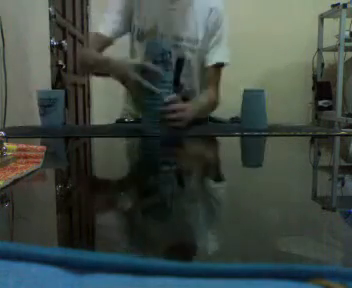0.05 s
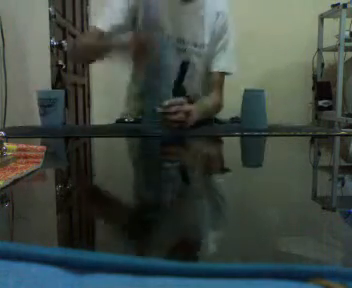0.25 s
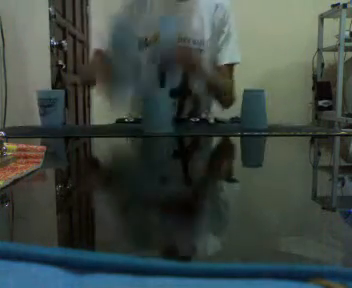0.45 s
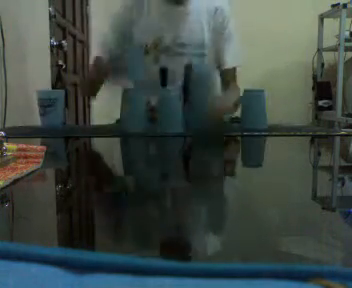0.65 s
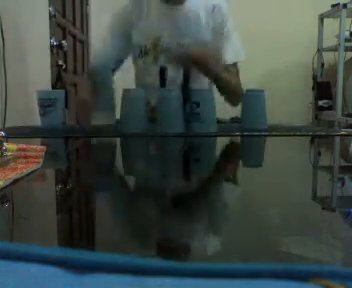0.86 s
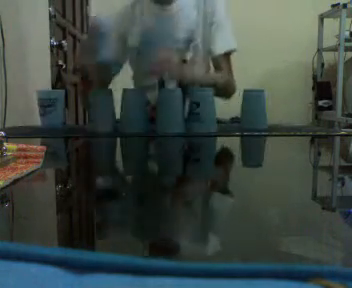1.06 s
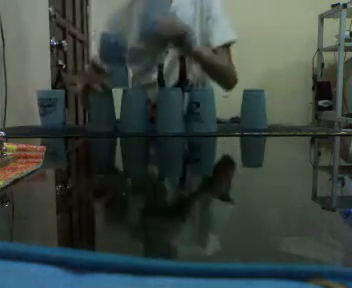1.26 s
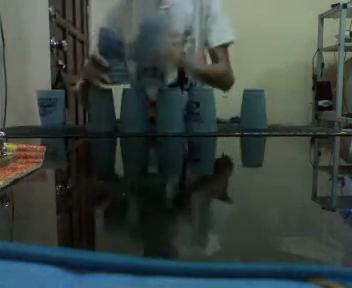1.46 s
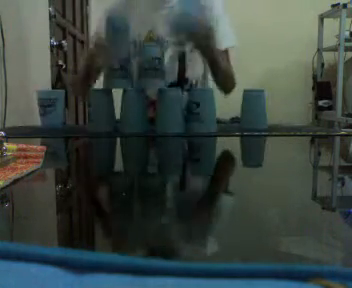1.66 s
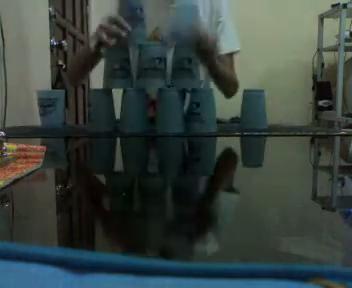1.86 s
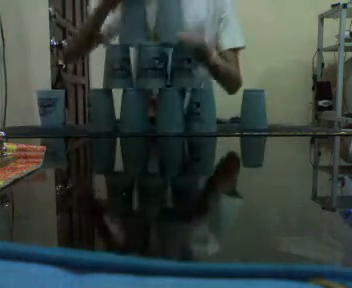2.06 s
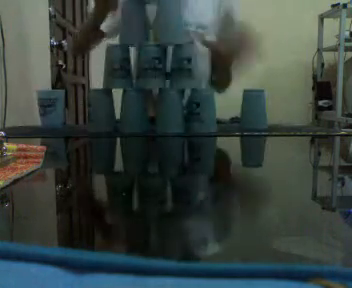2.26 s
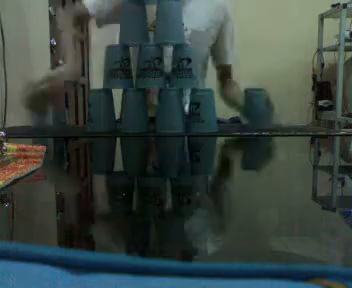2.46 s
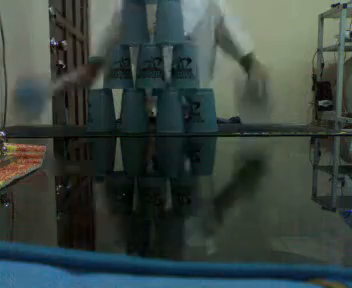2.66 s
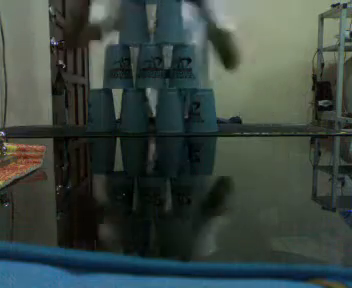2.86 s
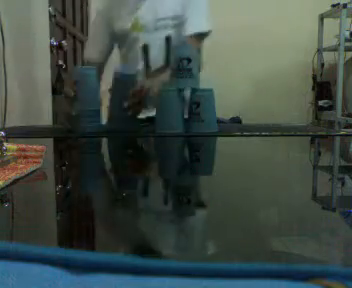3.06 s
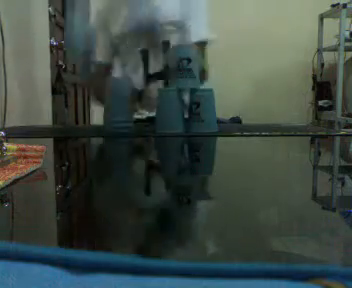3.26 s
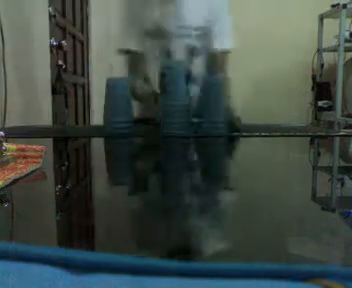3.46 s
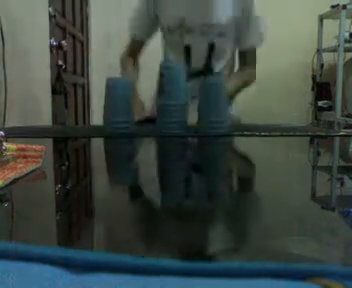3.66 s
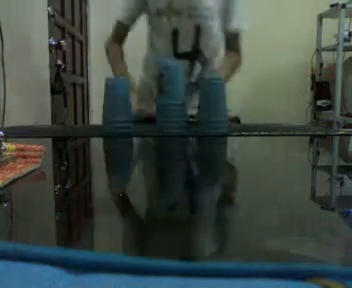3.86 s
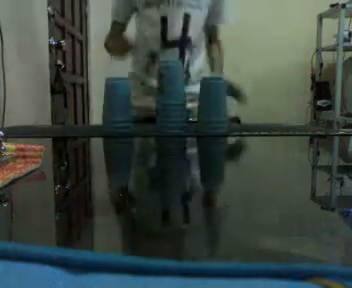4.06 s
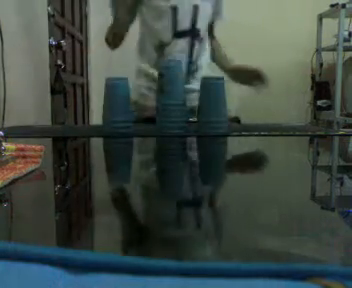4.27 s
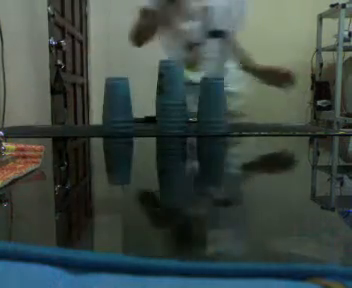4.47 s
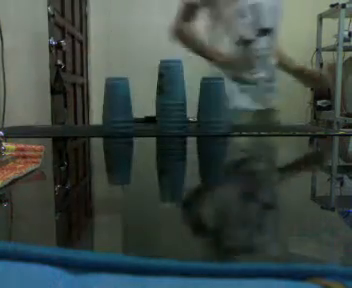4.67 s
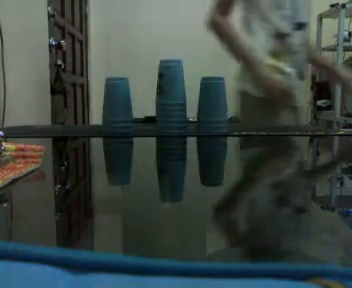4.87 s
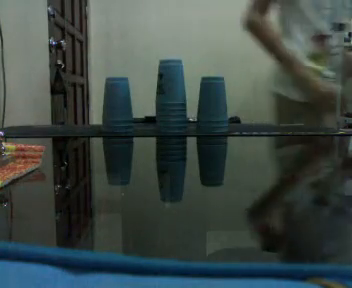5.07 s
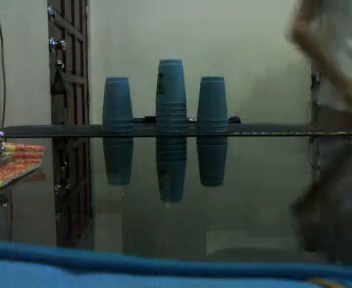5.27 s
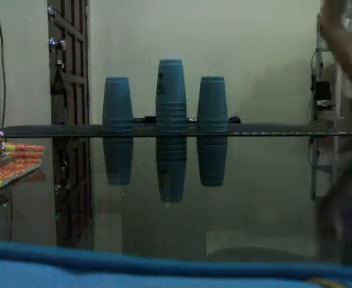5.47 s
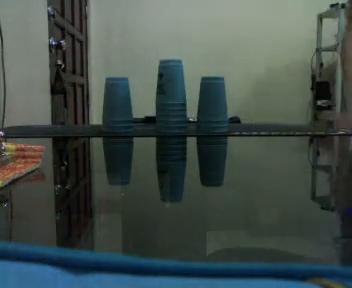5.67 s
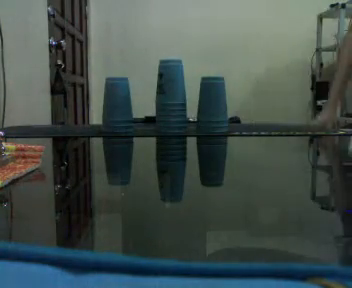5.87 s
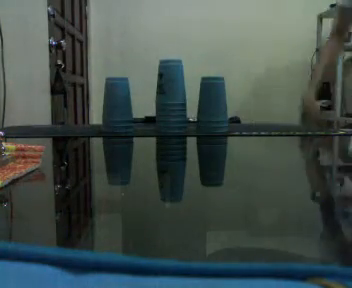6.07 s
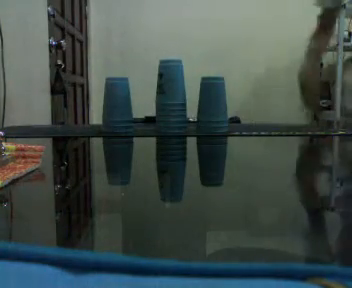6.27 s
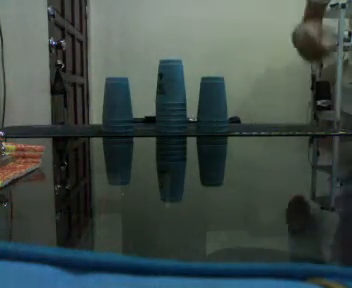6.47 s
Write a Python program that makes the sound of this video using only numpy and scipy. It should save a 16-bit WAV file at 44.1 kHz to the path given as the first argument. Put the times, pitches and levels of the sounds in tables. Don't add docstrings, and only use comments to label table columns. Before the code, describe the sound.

Hollow plastic cups clack in quick flurries on a hard tabletop, collapse in a rapid clatter, slam down in stacks, then quiet shuffling follows.

```python
import sys
import numpy as np
from scipy import signal
from scipy.fft import rfft, irfft
from scipy.io import wavfile
from scipy.ndimage import uniform_filter1d

SR = 44100
rng = np.random.default_rng(int(sys.argv[2]) if len(sys.argv) > 2 else 0)


def log_audio(samples):
    frames = np.atleast_2d(samples).T
    limited = np.clip(frames, -1, 1)
    pcm = np.round(limited * 32767).astype(np.int16)
    wavfile.write(sys.argv[1], SR, pcm)


def volts_from_decibels(level):
    exponent = np.asarray(level, float) / 20
    return 10 ** exponent


N = 288392


def evened(x):
    return x / np.sqrt(np.mean(x ** 2) + 1e-20)


def read(points, hz):
    f, value = np.transpose(points)
    return np.interp(np.log(hz + 1), np.log(f + 1), value)


def add(mix, s, sound):
    part = mix[round(s * SR):][:len(sound)]
    part += sound[:len(part)]


def filtered(x, points):
    gain = volts_from_decibels(read(points, np.fft.rfftfreq(len(x), 1 / SR)))
    return evened(irfft(rfft(x) * gain, len(x)))


def coloured(count, points):
    return filtered(rng.standard_normal(count), points)


def resonate(x, hz, width_hz):
    turn = np.exp(2j * np.pi * np.cumsum(hz) / SR)
    r = np.exp(-np.pi * width_hz / SR)
    return 2 * (turn * signal.lfilter([1 - r], [1, -r], x / turn)).real


def swell(t, rise_s):
    return (1 - np.exp(-t / rise_s)) ** 2


def ringing(modes, t, luck, extra_db=0, detune=0, longest_s=2):
    hz, db, t60 = np.transpose(modes)[:, :, None]
    t60 = np.minimum(t60, longest_s)
    size, pitch, phase = luck[:len(modes)].T[:, :, None]
    level = volts_from_decibels(db + extra_db + 3 * size) * np.exp(-np.log(1000) * t / t60)
    waves = np.sin(2 * np.pi * hz * (1 + detune * pitch) * t + 2 * phase)
    x = (level * waves).sum(0)
    return x / abs(x).max()


# f/Hz, level/dB, T60/s
SHELL_MODES = [(427, 7.5, 0.15), (558, 6.5, 0.021), (577.4, 3.5, 0.15), (673, 0.5, 0.18),
               (716, -22.5, 0.016), (811, 3, 0.039), (814, -6.5, 0.066), (894, -8, 0.075), (990, -9, 0.015),
               (995, 6.5, 0.18), (1173, -0.5, 0.028), (1230, 2.5, 0.019), (1304, -5, 0.12),
               (1341, 2, 0.033), (1540, 3.5, 0.03), (1578, 4, 0.017), (1740, -9.5, 0.058),
               (1812, -12, 0.027), (1976, -9, 0.12), (2200, -40.5, 0.02)]
# f/Hz, level/dB, T60/s
TABLE_RING = [(343.3, -6.5, 0.05), (364, -11, 0.15), (383.2, -2.5, 0.19), (399.6, -3.5, 0.066),
              (444, -20, 0.021)]
# f/Hz, level/dB, T60/s
TABLE_THUMP = [(81, -8, 0.035), (122, -1, 0.051), (120.4, -3.5, 0.22), (170, -3.5, 0.026),
               (196.4, -1.5, 0.096), (250.7, 2, 0.084)]


def blow(db, pop_hz, ring_db, thump_db, crack_db, nested, t, luck, grit):
    brief = t[:len(t) // 3]
    pop_s, rise_s, knock_db = (.03, .0016, -2) if nested else (.016, .0008, 8)
    knock = np.sin(2 * np.pi * 800 * brief) * volts_from_decibels(-60 * brief / 0.0052) * swell(brief, 0.0004)
    pop = np.sin(2 * np.pi * pop_hz * brief) * volts_from_decibels(-60 * brief / pop_s) * swell(brief, rise_s)

    octaves = np.log2(np.array(SHELL_MODES)[:, :1] / pop_hz)
    near_db = -10 * np.log10(1 + (octaves / 0.46) ** 2)
    shell = ringing(SHELL_MODES, brief, luck, near_db, .03, .055) * swell(brief, .0007)

    ring = ringing(TABLE_RING, t, luck[20:], 0, .02, .095) * swell(t, .003)
    thump = ringing(TABLE_THUMP, t, luck[24:]) * swell(t, 0.0018)
    crack_decay = volts_from_decibels(-60 * t / 0.016) + volts_from_decibels(-8 - 60 * t / 0.1)
    crack = grit * crack_decay * swell(t, 0.00083)
    out = volts_from_decibels(ring_db - 4) * ring + volts_from_decibels(thump_db + 8.5) * thump + volts_from_decibels(crack_db + 1.5) * crack
    add(out, 0, volts_from_decibels(knock_db) * knock + volts_from_decibels(3.0) * pop + shell)
    return volts_from_decibels(db) * out


# t/s, blow level/dB, pop f/Hz, table share level/dB
BUILDING = [(0.747, -0.5, 622, -6.5), (0.91, -6.5, 557, -1), (1.024, -29, 610, -9), (1.118, 4, 1062, -14),
            (1.42, -7.5, 1220, -12), (1.449, -11, 1300, -8), (1.472, -22.5, 1284, -10),
            (1.613, 1.5, 692, -25), (1.643, -7.5, 1110, -30), (1.708, -27, 1047, -17.5),
            (1.781, -24, 1230, -1.5), (1.837, -21, 1115, 0.5), (1.972, 5, 1097, -18),
            (1.997, -9, 1285, -29), (2.058, -15, 652, -37), (2.076, 0, 1030, -32), (2.101, -16, 907, -5),
            (2.181, -31.5, 970, -20), (2.204, -2, 944, -14), (2.214, -6, 512, -18), (2.229, -28, 940, -6),
            (2.264, -19, 861, -10), (2.303, -9, 917, -5), (2.316, -20, 900, -13), (2.335, -15.5, 894, -29)]
# t/s, blow level/dB, pop f/Hz, table share level/dB, crack level/dB
COLLAPSE = [(3.093, -7, 870, -4.5, -23), (3.108, 2.5, 938, -15.5, -30.5), (3.12, -4.5, 875, -24.5, -27),
            (3.131, -8.5, 995, -20, -28.5), (3.155, -5, 848, -25, -14.5), (3.179, 1, 996, -23, -18.5),
            (3.196, -1, 936, -35.5, -18), (3.212, -9.5, 1040, -14.5, -15.5),
            (3.223, -6.5, 1740, -11.5, -38), (3.248, -10.5, 830, -6.5, -13.5), (3.28, 0, 1350, 0.5, -19),
            (3.291, -7, 1840, -18.5, -22.5), (3.309, -13, 634, -10, -16), (3.562, -5.5, 634, -8.5, -22),
            (3.574, -9.5, 583, -5.5, -24.5), (3.609, 0.5, 1070, -10, -16.5),
            (3.621, -11.5, 782, -19.5, -28), (3.647, -7.5, 1676, -23, -32)]
# t/s, blow level/dB, pop f/Hz, table share level/dB, crack level/dB
SQUARING = [
    (3.678, -5, 612, -5, -11.5),
    (3.689, -4, 848, -11, -13),
    (3.704, -12, 940, -10.5, -7),
    (3.714, -12, 894, -1, -26.5),
    (3.859, -20.5, 907, -1, -2),
    (3.889, 0, 1070, -14.5, -11),
    (3.904, -6.5, 673, -13.5, -22),
]
# t/s, blow level/dB, pop f/Hz, table share level/dB, crack level/dB
TOUCHES = [(0.003, -25.5, 736, -12, -28), (0.263, -39, 900, 5.5, -20), (0.284, -39, 710, 12, -4),
           (0.365, -39.5, 1880, 4, 6), (0.498, -41.5, 1090, 7, -13), (2.64, -49, 910, 9, -2),
           (2.675, -34, 494, 6, -15), (2.848, -23, 566, 0.5, -26), (2.977, -46.5, 694.7, 10.5, -14),
           (4.321, -53, 1170, -16.5, 6.5), (4.367, -43, 1217, -19, -6), (5.056, -40.5, 825, -5.5, -3),
           (5.975, -38.5, 673, -12, -19), (6.389, -43.5, 710, -1, 1), (6.402, -42, 790, 13.5, -9)]


def landings():
    building = [(*row, -25 + 0.08 * row[1]) for row in BUILDING]
    kinds = [(building, -19.5), (COLLAPSE, -20), (SQUARING, -8.5), (TOUCHES, -12.5)]
    blows = []
    for rows, thump_db in kinds:
        for s, db, pop_hz, table_db, crack_db in rows:
            blows.append((s, db, pop_hz, table_db, thump_db + 0.72 * table_db, crack_db))
    return sorted(blows)


# f/Hz, level/dB
CRACK_COLOUR = [(1290, 0.5), (2200, 1.5), (2610, -3), (2910, -6), (3230, -6), (4920, -8.5), (7600, -24.5),
                (9880, -68), (16700, -120)]
# from t/s, to t/s
NESTING = (3.1, 3.23)


def cups():
    out, t = np.zeros(N), np.arange(SR // 2) / SR
    blows = landings()
    luck = rng.standard_normal((len(blows), 30, 3))
    grit = coloured(N + SR, CRACK_COLOUR)
    for k, (s, *row) in enumerate(blows):
        nested = NESTING[0] < s < NESTING[1]
        add(out, s, blow(*row, nested, t, luck[k], grit[round(s * SR):][:len(t)]))
    return signal.sosfilt(signal.butter(2, 70, "high", fs=SR, output="sos"), out)


# f/Hz, level/dB
HISS_COLOUR = [(1350, -8.5), (2300, -1.5), (2920, -12), (5070, -9), (5690, -15.5), (6740, -15), (7600, -27),
               (9880, -61), (16700, -120)]
# t/s, length/s, scrape level/dB, air gap f/Hz, hiss re scrape level/dB
STROKES = [(0.0, 0.2, -36.5, 760, -22), (0.756, 0.37, -43, 936, -4), (1.132, 0.38, -51.5, 1300, -11.5),
           (1.416, 0.056, -29.5, 1280, -16), (1.466, 0.23, -30, 1150, -3), (1.635, .33, -30, 1085, -17),
           (1.99, 0.16, -31, 1050, -4.5), (2.092, 0.15, -26, 970, -16.5), (2.208, 0.13, -36.5, 960, -13.5),
           (2.328, 0.24, -33, 880, -29), (3.113, 0.081, -36.5, 964, 9.5), (3.226, 0.14, -19.5, 988, -10),
           (3.29, .25, -25.5, 1020, -15), (3.575, 0.17, -25.5, 980, -10), (3.663, 0.096, -36, 920, 1),
           (3.754, 0.12, -28, 1290, -21), (3.896, .3, -34.5, 1320, -28), (5.06, 0.157, -48, 815, -18),
           (5.42, 0.057, -50, 870, -20)]
# t/s, hold/s, level/dB, f/Hz
RATTLES = [
    (1.423, .01, -21.5, 1750),
    (2.078, .012, -21.5, 1620),
    (3.18, 0.11, -19, 1685),
    (3.588, 0.12, -20.5, 1662),
    (3.894, 0.013, -19.5, 1713),
    (2.631, 0.043, -46, 2705),
    (5.124, .02, -51, 2800),
    (6.381, 0.014, -46.5, 2880),
]


def slides():
    out = np.zeros(N)
    tick_level = volts_from_decibels(4.5 * np.minimum(rng.exponential(1, N), 3))
    slips = rng.random((2, N)) < 3000 / SR
    ticks = rng.standard_normal((2, N)) * tick_level * slips
    hiss = filtered(ticks[0], HISS_COLOUR)
    rim_hz = np.full(N, 1800.)
    chatter = evened(resonate(resonate(ticks[1], rim_hz, 450), rim_hz, 600))

    for s, length, db, gap_hz, bright_db in STROKES:
        t = np.arange(0, length, 1 / SR)
        scrape_db = db - 13.5 * t / length
        hiss_db = scrape_db + bright_db - 8.5 * t / length
        chatter_db = scrape_db + 0.46 * bright_db - 5
        at = slice(round(s * SR), round(s * SR) + len(t))
        hz = np.full(len(t), gap_hz)
        scrape = evened(resonate(resonate(ticks[0, at], hz, 570), hz, 570))
        stroke = volts_from_decibels(hiss_db - 0.5) * hiss[at]
        stroke += volts_from_decibels(scrape_db - 4.5) * scrape
        stroke += volts_from_decibels(chatter_db - 5.5) * chatter[at]
        add(out, s, stroke * signal.windows.tukey(len(t), .1))

    fall_db_per_s, tail_s = 229.5, 0.072
    for s, hold, db, pitch_hz in RATTLES:
        t = np.arange(0, hold + tail_s, 1 / SR)
        hz = np.full(len(t), pitch_hz)
        hits = ticks[1, round(s * SR):][:len(t)]
        rattle = evened(resonate(resonate(hits, hz, 230), hz, 370))
        level = volts_from_decibels(db - fall_db_per_s * np.maximum(t - hold, 0) - 6.0)
        add(out, s, level * rattle * signal.windows.tukey(len(t), .15))
    return out


# t/s, level/dB, f/Hz, T60/s
THUDS = [
    (3.22, -21, 112, 0.22),
    (3.681, -12.5, 112, 0.18),
    (3.699, -8, 105.4, 0.098),
    (3.891, -8, 110, 0.083),
    (3.891, -12, 330, .08),
    (3.7, -15.5, 170, 0.077),
    (1.615, -26.5, 99, .15),
    (2.078, -27.5, 110, 0.13),
    (3.9, -42, 40, 0.43),
]
# f/Hz, level/dB, T60/s
FRAME_MODES = [(56, 4, .6), (110, 0.5, 1.13), (159, -7, 1.1), (173, 2.5, 1.5)]


def frame():
    out, t = np.zeros(N), np.arange(SR) / SR
    for s, db, hz, t60 in THUDS:
        add(out, s, volts_from_decibels(db - 60 * t / t60) * np.sin(2 * np.pi * hz * t) * swell(t, 0.0014))
    hum = ringing(FRAME_MODES, t, np.zeros((4, 3))) * swell(t, .01)
    add(out, 3.9, volts_from_decibels(-27.5) * hum)
    return out


# t/s, level/dB
ECHOES = [(.004, -9.5), (.009, -6), (.013, -4.5), (.019, -14.5), (.027, -13.5)]
# f/Hz, T60/s
ROOM_DECAY = [(100, 0.32), (300, 0.5), (700, 0.44), (1300, 0.46), (2500, 0.57), (5000, 0.38)]


def room(x, wet_db=-8.5, echo_db=-5.0):
    out, t = x.copy(), np.arange(N) / SR
    for k, (s, db) in enumerate(ECHOES):
        add(out, s, (-1) ** k * volts_from_decibels(db + echo_db) * x)
    for k in range(3):
        taps = np.zeros(SR)
        at = np.arange(400, SR - 20, 20)
        taps[at + rng.integers(0, 20, len(at))] = rng.choice([-1., 1.], len(at))
        hz, when, z = signal.stft(taps, SR, nperseg=512)
        decay = volts_from_decibels(-60 * when / read(ROOM_DECAY, hz)[:, None])
        tail = signal.istft(z * decay, SR, nperseg=512)[1]
        share = np.sqrt(2 / 3) * np.cos(2 * np.pi * (1.7 * t + k / 3))
        out += volts_from_decibels(wet_db) * signal.fftconvolve(x * share, tail / np.linalg.norm(tail))[:N]
    return out


# t/s, level/dB
BUSY = [(0, -47.5), (2.5, -53), (3.1, -48.5), (4.2, -55), (4.7, -59), (5.04, -73), (5.07, -56.5),
        (6.54, -57)]
# t/s, body level/dB, rustle level/dB
MOVES = [(0.012, -39, -54.5), (0.28, -46, -58), (0.38, -58, -43), (0.5, -65.5, -49), (2.65, -48, -48.5),
         (2.855, -44, -48.5), (4.16, -51, -53.5), (4.32, -68, -49.5), (4.4, -46, -52.5), (5.07, -56, -61),
         (5.2, -60, -50.5), (5.46, -50, -56), (5.88, -48, -66), (6.06, -52, -51), (6.41, -48, -51.5),
         (6.53, -54, -43.5)]


def stir():
    t = np.arange(N) / SR
    lumps = evened(uniform_filter1d(rng.standard_normal((2, N)), 600, axis=1))
    body_colour = [(90, -16.5), (130, -9.5), (400, -0.5), (1200, -4.0), (1900, -10), (2600, -37.5)]
    rustle_colour = [(1500, -5), (2600, 0.0), (3800, -4.0), (5000, -1.5), (7000, -13.5)]
    body = volts_from_decibels(0.72 * lumps[0]) * coloured(N, body_colour)
    rustle = volts_from_decibels(1.8 * lumps[1]) * coloured(N, rustle_colour)
    body_db = np.interp(t, *np.transpose(BUSY))
    rustle_db = body_db - 3
    rise_db_per_s, fall_db_per_s = 296, 72
    for s, step_db, swing_db in MOVES:
        shape_db = np.minimum(rise_db_per_s * (t - s), fall_db_per_s * (s - t))
        body_db = np.maximum(body_db, step_db + shape_db)
        rustle_db = np.maximum(rustle_db, swing_db + shape_db)
    return volts_from_decibels(body_db) * body + volts_from_decibels(rustle_db) * rustle


# f/Hz, level/dB per Hz
AIR_COLOUR = [(18, -44), (30, -7.5), (65, -9.5), (149, -9), (198, -5), (222, -30), (255, -5), (436, -13),
              (1890, -10.5), (2070, -16.5), (2740, -19.5), (6330, -22), (7800, -43.5), (10100, -73.5),
              (17200, -120)]
# f/Hz, level/dB
HUM = [(59.2, -61)]


def air():
    t = np.arange(N) / SR
    waver = volts_from_decibels(0.83 * evened(uniform_filter1d(rng.standard_normal(N), 6000)))
    hum = sum(np.sqrt(2) * volts_from_decibels(db) * np.sin(2 * np.pi * hz * t) for hz, db in HUM)
    return volts_from_decibels(-49 - 3.5) * coloured(N, AIR_COLOUR) + hum * waver


def scene():
    return (room(cups() + slides()) * volts_from_decibels(1.5) + frame() + stir() + air())[None]


def low_pass(x):
    return signal.sosfilt(signal.butter(12, 16100, fs=SR, output="sos"), x)


def record(dry):
    thin = signal.lfilter(*signal.butter(1, 25, "high", fs=SR), dry)
    over = np.clip(thin, -.69, .71)
    lowpass = signal.firwin(301, 7450, window=("kaiser", 11), fs=SR)
    narrow = signal.oaconvolve(over, lowpass[None], "same")
    finished = np.clip(narrow, -.695, .72) - .0117
    return low_pass(finished)


dry = scene()
out = record(dry)
log_audio(out)
```